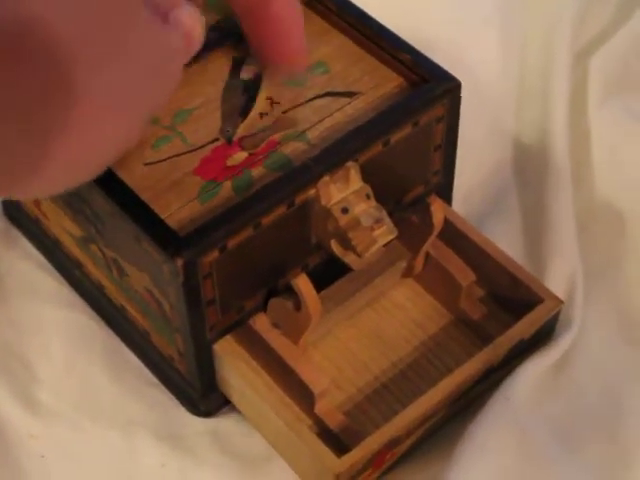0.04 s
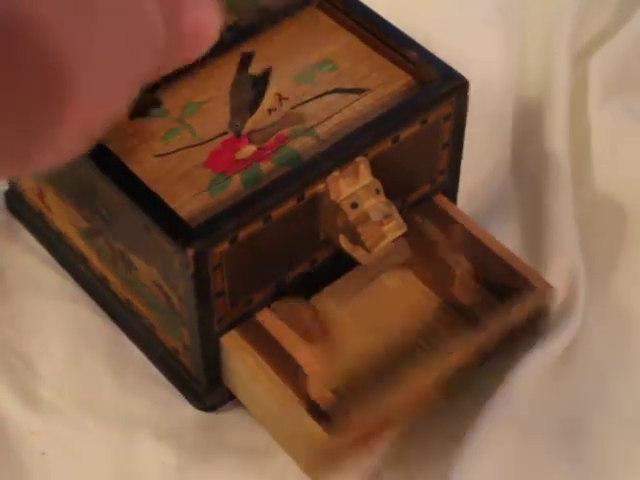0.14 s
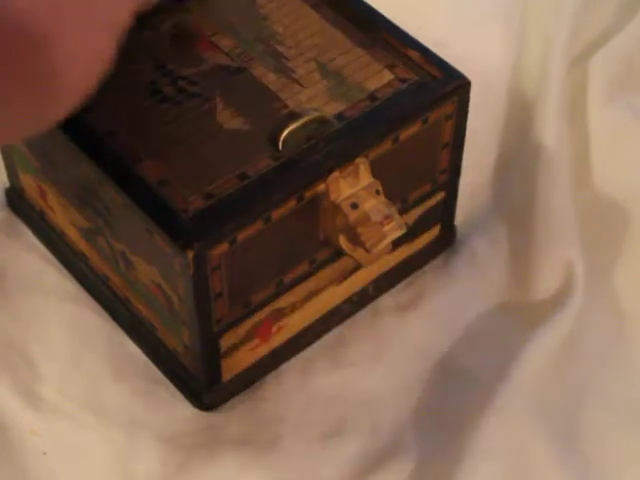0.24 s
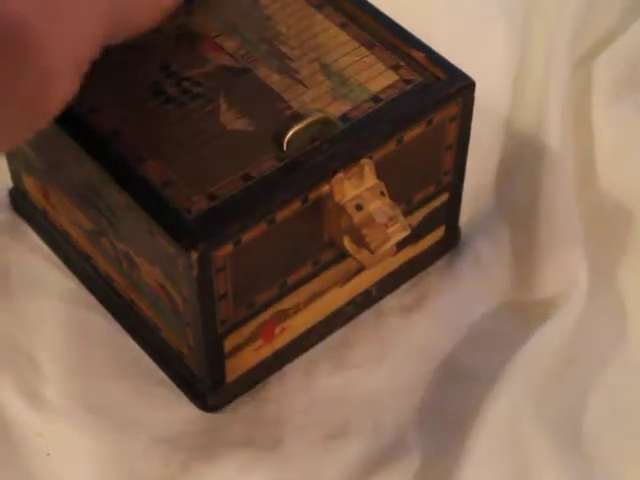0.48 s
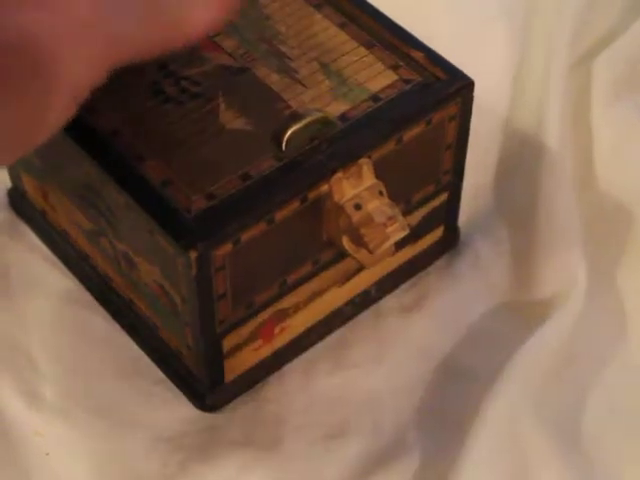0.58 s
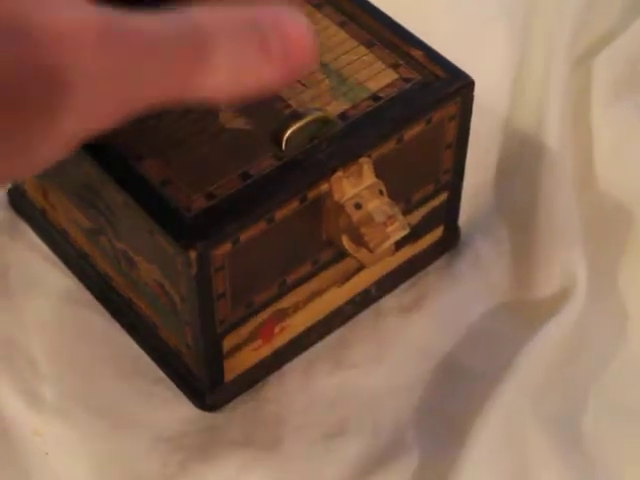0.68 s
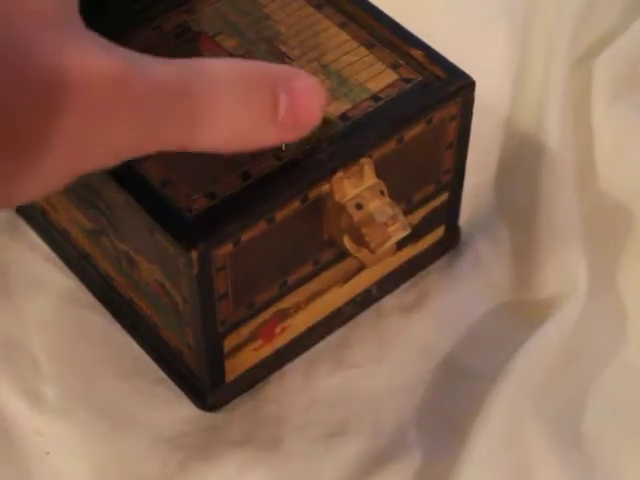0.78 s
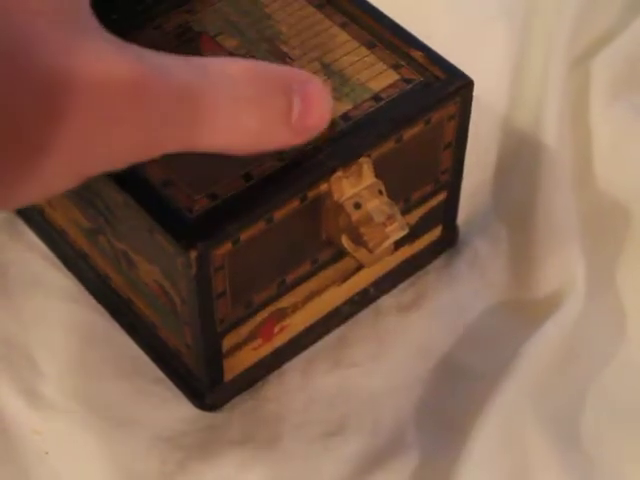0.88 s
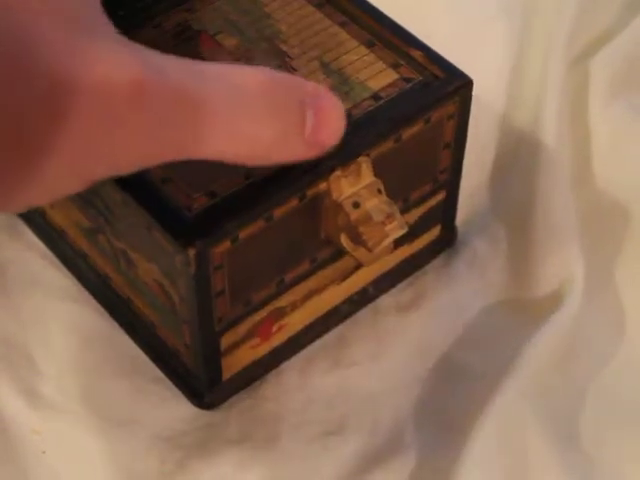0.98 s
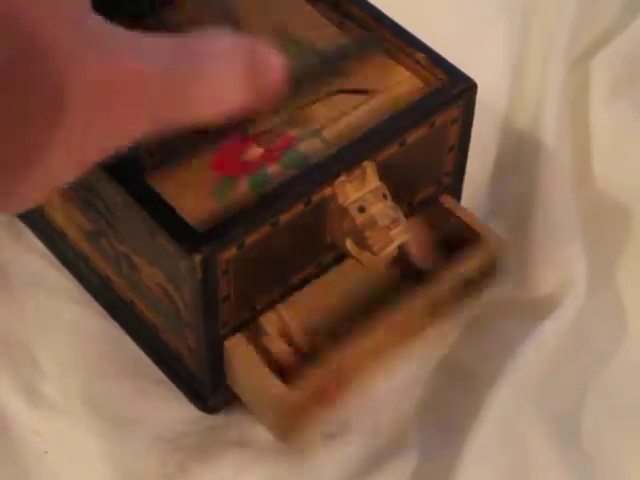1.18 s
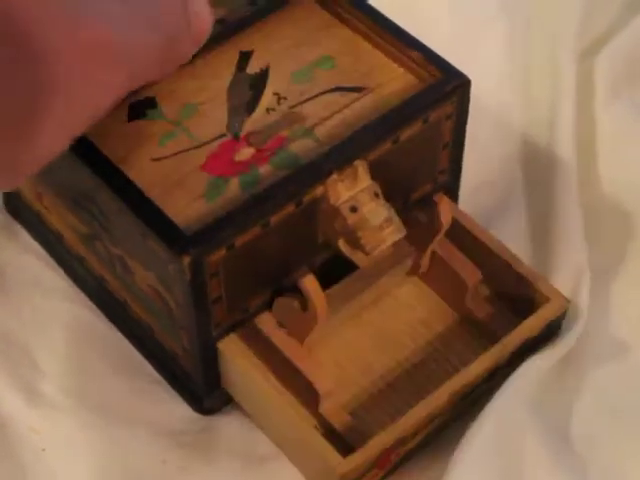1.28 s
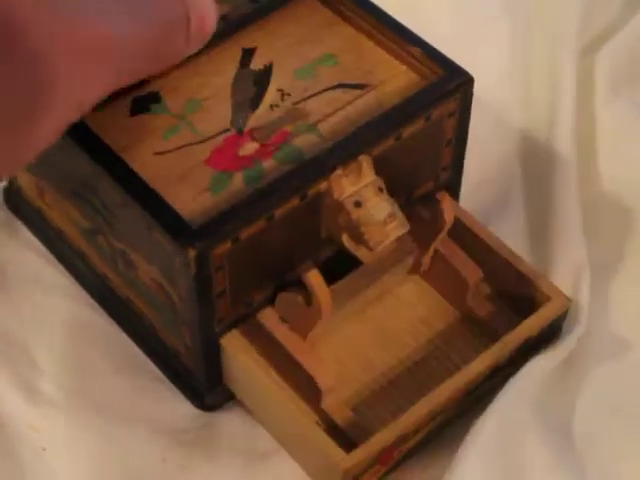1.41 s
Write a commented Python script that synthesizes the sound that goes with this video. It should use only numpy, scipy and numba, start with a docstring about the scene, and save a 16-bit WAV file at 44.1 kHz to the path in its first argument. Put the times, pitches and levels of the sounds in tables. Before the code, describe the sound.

Close up in a quiet, faintly hissing room, a little wooden box's drawer and lid slide and clack shut loudly. After a pause and a few soft finger thumps, the drawer springs out with a quick wooden rattle.

```python
"""A small wooden trick box on a cloth, close by in a quiet room with a faint hiss and hum.
A finger touches it; the drawer scrapes in, judders and clacks shut under the sliding lid.
The hardest clack overloads the microphone, whose gain ducks and creeps back; a low thump and the
drawer's dull ring follow. A thumb taps and presses the top with soft thumps, the catch lets go,
the lid slides back and the drawer shoots out, rattling on its runners."""
import sys
import numpy as np
from scipy import signal
from scipy.fft import rfft, irfft
from scipy.io import wavfile
from numba import njit

SR = 44100
rng = np.random.default_rng(int(sys.argv[2]) if len(sys.argv) > 2 else 0)


def master_out(mix):
    """Clip the mix to full scale and print it as 16-bit PCM to the path in sys.argv[1]."""
    frames = np.transpose(np.atleast_2d(mix))
    ceiling = np.clip(frames, -1, 1)
    pcm = np.round(ceiling * 32767).astype(np.int16)
    wavfile.write(sys.argv[1], SR, pcm)


N = 63945

# colour of the room's hiss (frequency [Hz], relative level [dB])
HISS_SPECTRUM = [(18, -43), (30, -24.5), (281, -4.5), (364, -4.5), (524, -5), (680, -11.5), (735, -4),
                 (794, -6), (1970, -6), (2130, -8), (5300, -12.5), (15000, -29.5)]
# faint tones in the room (frequency [Hz], level [dB])
HUM_TONES = [(538, -72), (641, -68), (1303, -73.5), (1999, -70.5)]

# four-band EQ of each knock and slide: bass, middle, presence, treble (centre [Hz])
EQ_BANDS = [560, 1800, 3500, 6700]
# fingers on the top
# (time [s], bass [dB], middle [dB], presence [dB], treble [dB], pitch [factor], ring length [factor])
FINGER_TAPS = [(.069, -42, -43.5, -41.5, -45, 0.95, .8), (.791, -33.5, -51, -44, -49, 0.91, 0.81),
               (.875, -35, -54, -54, -53, 0.76, 1.1), (.8938, -20.5, -24, -33, -37, 0.92, 0.47),
               (.9825, -33.5, -52, -42, -52.5, 0.73, 0.88), (1.066, -24.5, -39.5, -32.5, -35, 0.94, 0.72)]
# lid and catch striking the case
# (time [s], bass [dB], middle [dB], presence [dB], treble [dB], pitch [factor], ring length [factor])
LID_CLACKS = [(.1417, -34, -14, -39.5, -33, 1.1, 0.76), (.1586, -18.5, -19, -18, -31, 1.0, 1.1),
              (.2, -26, -32, -27.5, -12.5, 1.04, 0.45), (.2186, -13, -8, -14, -8.5, 0.89, 0.7),
              (.2312, -21, -13.5, -18.5, -19.5, .94, .9), (.2379, -12, 3.5, -6.5, 2.5, 0.94, 0.51),
              (.2402, -35, -1, -22, -33.5, .92, 0.75), (.2497, -15.5, -8, -2, 8, 1.22, 0.3),
              (.2544, -7.5, 9.5, 15, 14.5, 1.0, 0.78), (1.19, -2.5, -5.5, -5, -0.5, 1.0, 0.87),
              (1.1942, -15, -3, -17, -38, .98, 0.91)]
# woody resonances of the case (frequency [Hz], level [dB], t60 [s])
CASE_MODES = [(585.5, -15.5, .045), (657.8, -8, 0.053), (1175, -10, .038), (1380, -10, .035),
              (1732, -7, 0.02), (2050, -5.5, 0.027), (2400, -19.5, 0.02), (2700, -6.5, .022),
              (3066, -5.5, 0.027), (3886, -14.5, 0.018), (5610, -17.5, 0.02), (6472, 1, 0.017),
              (7220, -9.5, .012)]
# faint long rings of the cavity and its small metal parts (frequency [Hz], level [dB], t60 [s])
CAVITY_MODES = [(612.4, -53.5, 0.27), (674, -39.5, .45), (1170, -41, 0.69), (1825, -42, 0.9),
                (3060, -49, .35), (3524, -44.5, 0.49), (6447, -47, .35)]
# colour of the crack that opens a tap or clack (frequency [Hz], relative level [dB])
CRACK_SPECTRUM = [(140, -25), (300, -16.5), (500, -4), (900, 5.5), (1500, 7.5), (3000, 8.5), (4500, 3),
                  (7800, 2.5), (9600, -13), (15000, -33)]

# wood rubbing on wood, swelling and dying away
# (peak time [s], rise [s], fall [s], bass [dB], middle [dB], presence [dB], treble [dB])
SLIDE_STROKES = [(.168, 0.018, 0.035, -33.5, -45, -44, -40.5),
                 (0.206, 0.01, 0.0074, -30.5, -29.5, -23.5, -23),
                 (0.223, 0.01, 0.024, -21.5, -21, -20.5, -23),
                 (0.232, 0.018, 0.0088, -28.5, -22.5, -17.5, -15),
                 (1.185, 0.024, 0.021, -22, -33, -29, -23.5), (1.242, 0.012, 0.012, -29.5, -27, -27, -21),
                 (1.281, 0.038, 0.031, -28, -31.5, -28, -33.5)]
# colour of the rubbing (frequency [Hz], relative level [dB])
RUB_SPECTRUM = [(40, -37), (150, -21.5), (300, -9.5), (600, 5), (900, -0.5), (1300, 5), (3000, 1),
                (4200, -1), (6500, -2.5), (8200, -4.5), (10000, -17), (15000, -35)]
# the drawer binding on its way in (peak time [s], half width [s], frequency [Hz], level [dB])
DRAWER_JUDDERS = [(.221, 0.0047, 1163, -19.5), (.2325, .0065, 595, -19.5)]
# a low thump and the drawer's dull ring after the hardest clack, then soft thumps under the thumb
# (time [s], frequency [Hz], level [dB], t60 [s])
LOW_THUDS = [(0.2564, 80, -26, .025), (0.259, 310, -23.5, 0.063), (.272, 455, -29.5, 0.11),
             (0.9812, 424, -38, 0.027), (1.083, 188, -52, .12)]

# the drawer knocking on its runners
# (time [s], bass [dB], middle [dB], presence [dB], treble [dB], pitch [factor], ring length [factor])
DRAWER_RATTLES = [(1.2199, -4.5, -10.5, -2.5, -3, 0.91, 0.52), (1.2354, -6.5, -13, -2, -5, 0.89, 0.55),
                  (1.2553, -7, -7, -5.5, -4, 0.94, 0.66), (1.2656, -1.5, -6.5, -6.5, -0.5, 0.96, 0.81),
                  (1.2808, -9, -5.5, -12.5, -13.5, 0.925, 0.84),
                  (1.2895, -23.5, -17.5, -16.5, -17.5, 0.7, 1.1)]
# woody resonances of the drawer (frequency [Hz], level [dB], t60 [s])
DRAWER_MODES = [(351.3, -33, 0.0347), (472, -14, 0.06), (596, -6, 0.0471), (665.5, -9.5, .045),
                (786, -12.5, 0.035), (1110, -11, 0.041), (1394, -8, 0.042), (2103, -21.5, 0.023),
                (3070, -12.5, 0.012), (4180, -3, 0.01), (6100, -14, 0.0142), (6670, -3.5, 0.0111),
                (8400, -18, 0.0111)]
# colour of the runners' crisper tick (frequency [Hz], relative level [dB])
TICK_SPECTRUM = [(140, -17), (300, -16), (500, 1.5), (1500, 1), (2500, 0), (3900, 2), (5000, -3), (8400, 0),
                 (10300, -13.5), (15000, -36)]
# colour of the room's reflections (frequency [Hz], relative level [dB])
REVERB_SPECTRUM = [(80, -3.5), (400, 5), (2000, 0), (4000, -3.5), (7500, -2.5), (10000, 1), (15000, -25)]


def undb(db):
    """Decibels to gain."""
    return 10 ** (np.asarray(db) / 20)


def unit_energy(response):
    """Scale a response to unit energy."""
    return response / np.sqrt(np.sum(response ** 2))


def convolve(x, response):
    """Play a sound through a response."""
    return signal.fftconvolve(x, response)[:len(x)]


def eq_curve(points, size=1024):
    """Minimum-phase filter response through (frequency [Hz], level [dB]) points."""
    hz, db = np.array(points, float).T
    grid_hz = np.maximum(np.arange(size // 2 + 1) * SR / size, 1)
    gain = undb(np.interp(np.log(grid_hz), np.log(hz), db))
    cepstrum = irfft(np.log(gain))
    cepstrum[1:size // 2] *= 2
    cepstrum[size // 2 + 1:] = 0
    return irfft(np.exp(rfft(cepstrum)))


def noise(spectrum, count):
    """Coloured noise at unit level."""
    response = unit_energy(eq_curve(spectrum))
    return signal.fftconvolve(rng.standard_normal(count + len(response) - 1), response, "valid")


def decay(t, t60):
    """Envelope that falls 60 dB in t60 seconds."""
    return np.exp(-np.log(1000) * t / t60)


def ring(modes, t, pitch=1, length=1):
    """Struck resonances as dying sines; from 1 kHz up they alternate in polarity."""
    out = np.zeros(len(t))
    for k, (hz, db, t60) in enumerate(modes):
        polarity = 1 if hz < 1000 else (-1) ** k
        out += polarity * undb(db) * np.sin(2 * np.pi * hz * pitch * t) * decay(t, t60 * length)
    return out


def wavering_tone(hz, t, wander_rad):
    """A sine whose phase drifts by a random step each sample."""
    return np.sin(2 * np.pi * hz * t + wander_rad * np.cumsum(rng.standard_normal(len(t))))


def room_tone(hiss_db=-57):
    """A bed of steady hiss with a few faint, wavering tones."""
    t = np.arange(N) / SR
    hum = sum(undb(db) * np.sqrt(2) * wavering_tone(hz, t, wander_rad=.025) for hz, db in HUM_TONES)
    return undb(hiss_db) * noise(HISS_SPECTRUM, N) + hum


def knocks(hits, modes, crack_spectrum, crack_db, crack_t60_s, cavity_db, attack_s=.0003):
    """Each contact gives a short crack and rings the wood and cavity, through its own EQ."""
    t, out = np.arange(SR // 2) / SR, np.zeros(N + SR)
    attack = 1 - np.exp(-t / attack_s)
    cavity = undb(cavity_db) * ring(CAVITY_MODES, t)
    for start, *band_db, pitch, length in hits:
        crack = undb(crack_db) * noise(crack_spectrum, len(t)) * decay(t, crack_t60_s * length)
        wood = ring(modes, t, pitch, length) / 2
        hit = (wood + crack + cavity) * attack
        at = int(start * SR)
        out[at:at + len(t)] += convolve(hit, eq_curve(list(zip(EQ_BANDS, band_db))))
    return out[:N]


def slides(slips_per_s=12000, spread_db=2.5, body_db=-5.5):
    """Wood grain catches in dense tiny slips that hiss and ring the case."""
    t, out = np.arange(N) / SR, np.zeros(N)
    hiss = unit_energy(eq_curve(RUB_SPECTRUM))
    body = unit_energy(ring(CASE_MODES, t[:SR // 8]))
    for peak, rise, fall, *band_db in SLIDE_STROKES:
        clicks = (rng.random(N) < slips_per_s / SR) * rng.choice([-1, 1], N)
        grains = clicks * undb(spread_db * rng.standard_normal(N))
        swell = np.exp(np.minimum((t - peak) / rise, (peak - t) / fall))
        slips = grains / grains.std() * swell
        rub = convolve(slips, hiss) + undb(body_db) * convolve(slips, body)
        out += convolve(rub, eq_curve(list(zip(EQ_BANDS, band_db))))
    return out


def judders():
    """The drawer binds: short stick-slip groans, each on one resonance of the wood."""
    t, out = np.arange(N) / SR, np.zeros(N)
    for peak, width, hz, db in DRAWER_JUDDERS:
        swell = np.exp(-((t - peak) / width) ** 2)
        out += undb(db) * swell * wavering_tone(hz, t, wander_rad=.012)
    return out


def thuds(attack_s=.0017):
    """Low thumps and dull rings, each a single damped tone with a soft attack."""
    out = np.zeros(N)
    for start, *mode in LOW_THUDS:
        t = np.maximum(np.arange(N) / SR - start, 0)
        out += ring([mode], t) * (1 - np.exp(-t / attack_s))
    return out


def small_body(x, low_cut_hz=250.2):
    """A small wooden box radiates little bass: a steep low cut."""
    return signal.sosfilt(signal.butter(4, low_cut_hz, "highpass", fs=SR, output="sos"), x)


def reverb(x, early_db=-17.5, early_t60_s=.088, tail_db=-23.5, tail_t60_s=.26, build_s=.004):
    """Early scatter from the table and nearby things, then the short tail of a furnished room."""
    t = np.arange(SR // 2) / SR
    build = 1 - np.exp(-(t / build_s) ** 2)
    early = unit_energy(noise(REVERB_SPECTRUM, len(t)) * decay(t, early_t60_s) * build)
    tail = unit_energy(noise(REVERB_SPECTRUM, len(t)) * decay(t, tail_t60_s) * build)
    return convolve(x, undb(early_db) * early + undb(tail_db) * tail)


def scene():
    """The mono mix: the box and its reverb over the room tone."""
    clacks = knocks(LID_CLACKS, CASE_MODES, CRACK_SPECTRUM,
                    crack_db=-7, crack_t60_s=.032, cavity_db=-26.5)
    rattles = knocks(DRAWER_RATTLES, DRAWER_MODES, TICK_SPECTRUM,
                     crack_db=-7, crack_t60_s=.02, cavity_db=-7)
    taps = knocks(FINGER_TAPS, CASE_MODES, CRACK_SPECTRUM, crack_db=-5.5, crack_t60_s=.035, cavity_db=-8)
    box = small_body(taps + clacks + slides() + judders() + rattles) + thuds()
    return (box + reverb(box) + room_tone())[None]


@njit
def ducking_db(x, threshold, attack_s, recover_db_per_s):
    """Gain reduction: ducks as the smoothed level passes the threshold, then creeps steadily back."""
    out, level, cut_db = np.empty(len(x)), 0., 0.
    for i in range(len(x)):
        level += (abs(x[i]) - level) / (attack_s * SR)
        over_db = 20 * np.log10(max(level / threshold, 1.))
        cut_db = max(cut_db - recover_db_per_s / SR, over_db)
        out[i] = cut_db
    return out


def record(dry, high_cut_hz=15400):
    """The microphone: automatic gain, hard clipping on the loudest clack and a steep high cut."""
    cut_db = ducking_db(dry[0], threshold=float(undb(-10.5)), attack_s=.0029, recover_db_per_s=18.5)
    clipped = np.clip(dry * undb(-cut_db), -1, 1)
    return signal.sosfilt(signal.ellip(8, .2, 70, high_cut_hz, fs=SR, output="sos"), clipped)


dry = scene()
out = record(dry)
master_out(out)
```